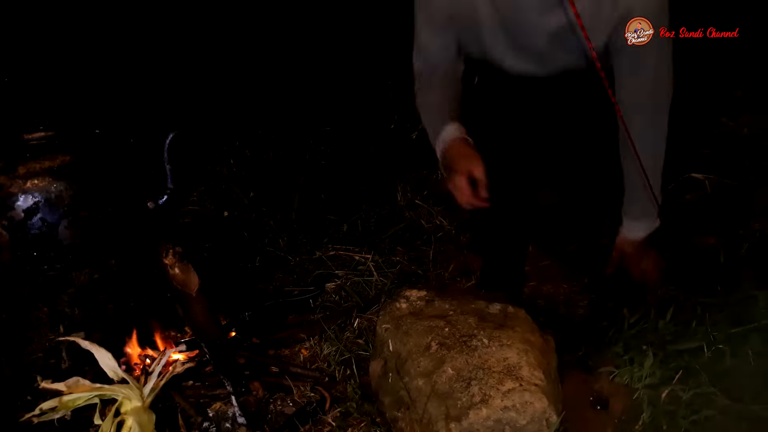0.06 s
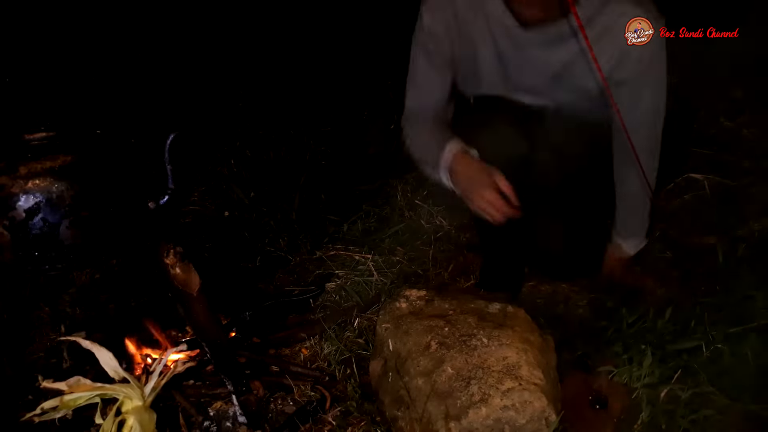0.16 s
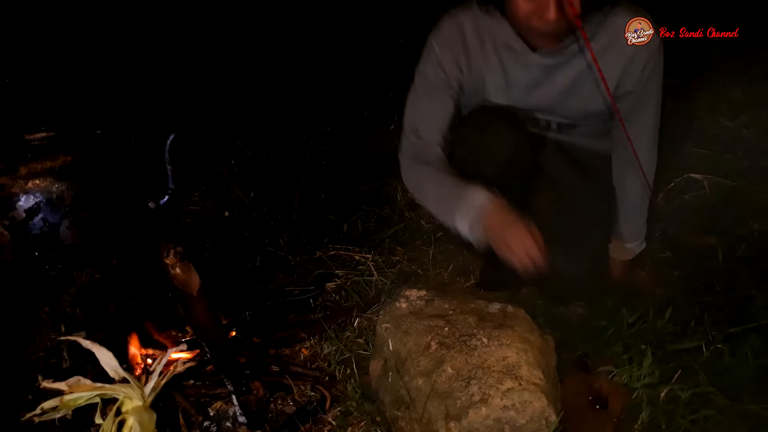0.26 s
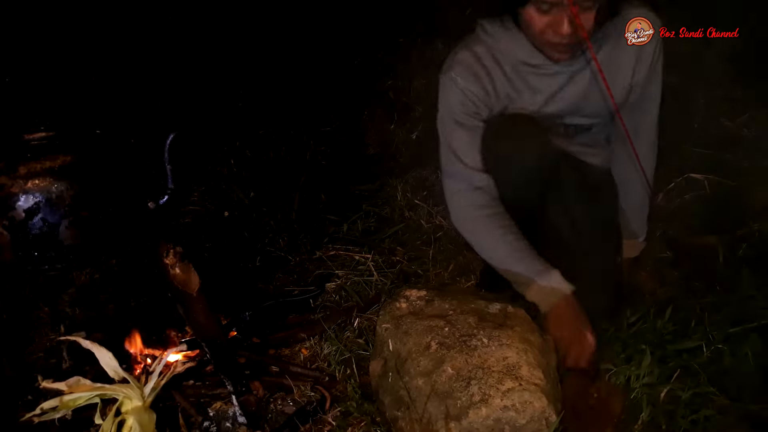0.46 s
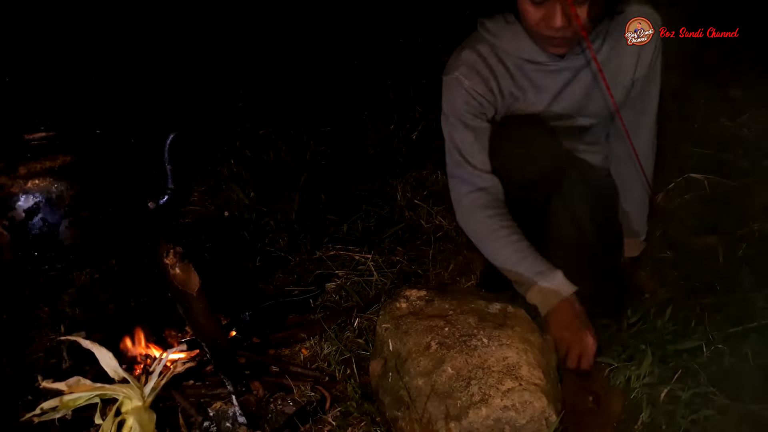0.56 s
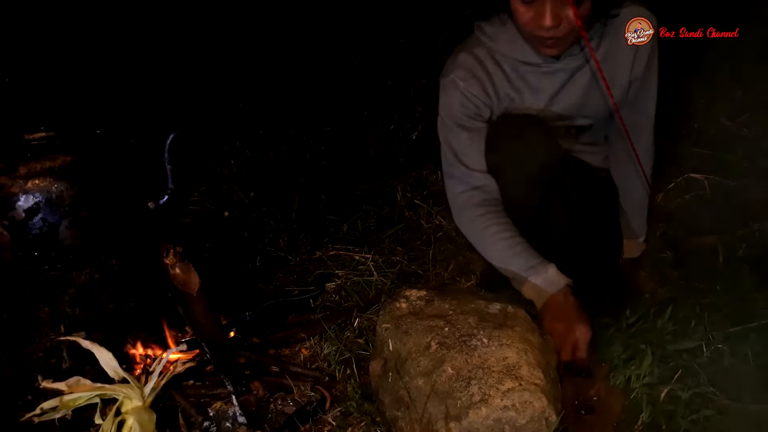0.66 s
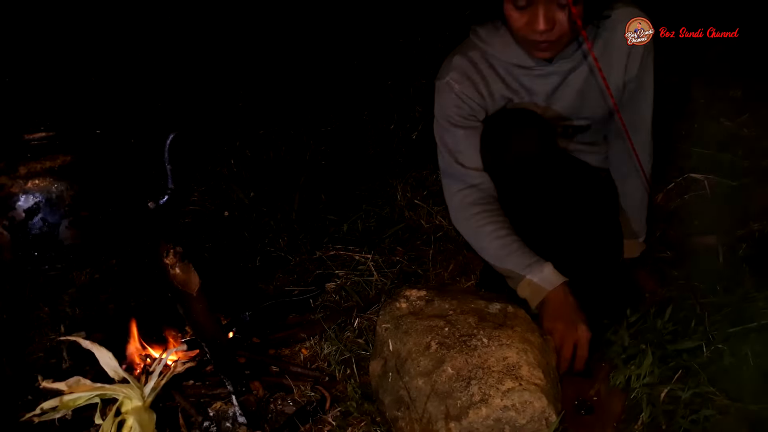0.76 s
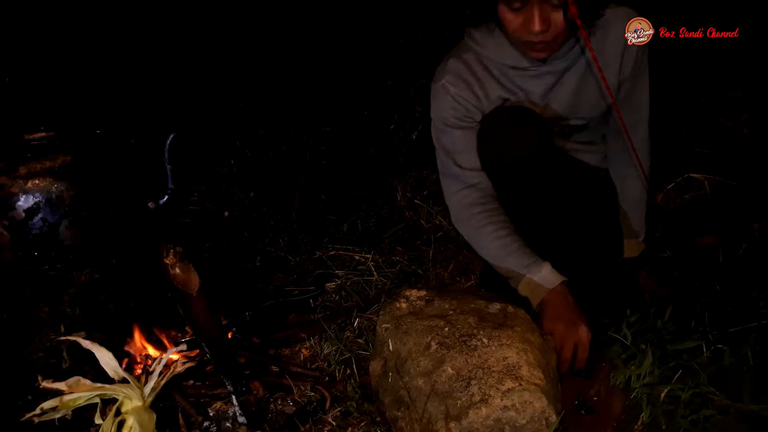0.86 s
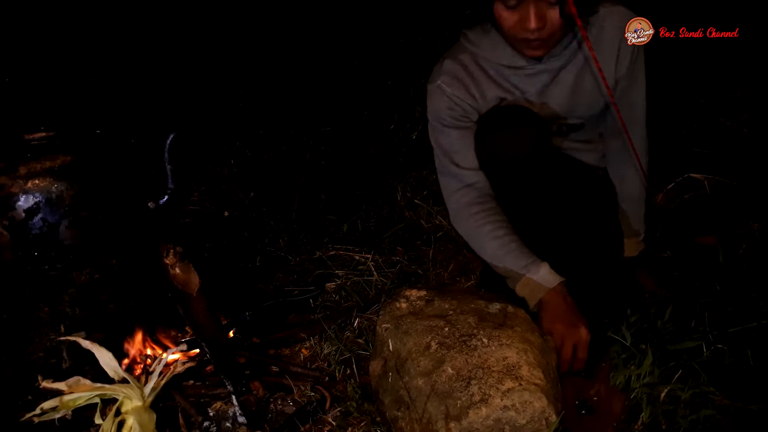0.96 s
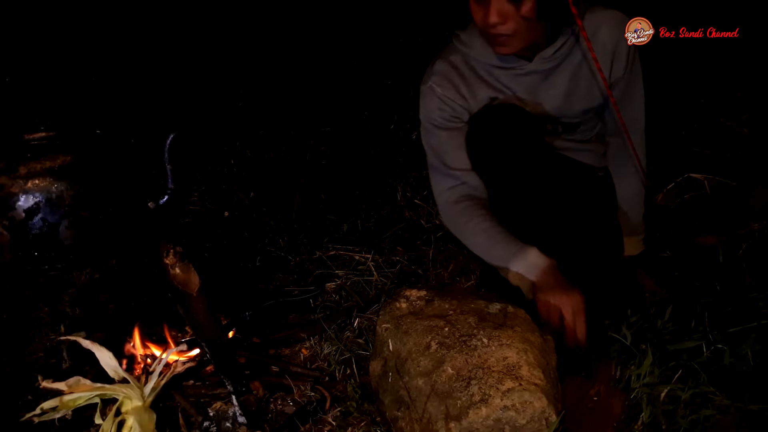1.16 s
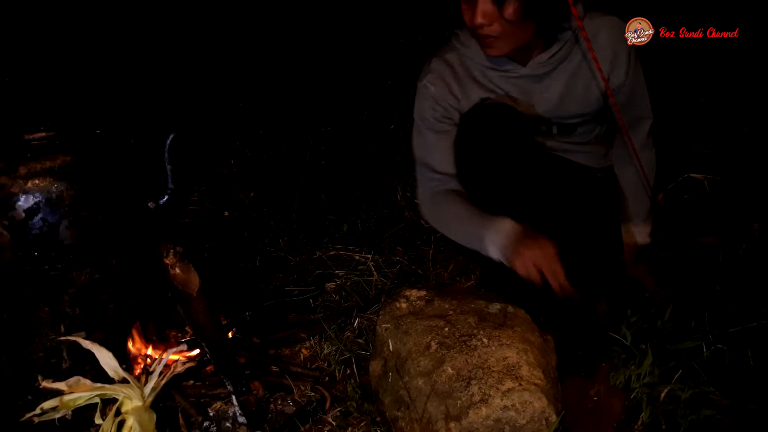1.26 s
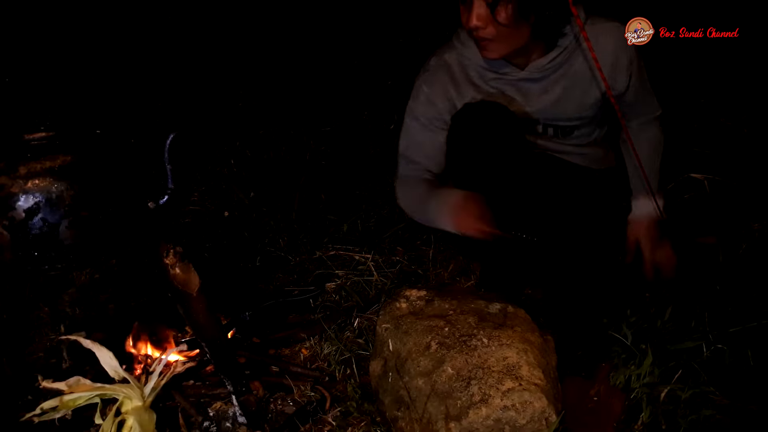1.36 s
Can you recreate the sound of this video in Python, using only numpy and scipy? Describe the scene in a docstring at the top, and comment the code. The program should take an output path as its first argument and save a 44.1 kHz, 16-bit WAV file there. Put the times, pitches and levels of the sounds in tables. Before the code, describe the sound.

A small fire of dry stalks crackles close by outdoors at night. Light ticks open, with a crisp double pop at 0.24 s. Snaps thicken from 0.4 s, some with a brief hollow woody ring, and strong pops at 0.5-0.6 s lead to the loudest crack at 0.67 s. Then sparse small pops continue to 1.4 s. Flame hiss swells midway and sinks; distant insects shimmer and a cricket pulses rapidly throughout.

```python
"""Sharp pops with short scattered tails, from a small fire of dry stalks outdoors at night. Among them come thin
treble ticks, low puffs, a hollow stalk that rings when it cracks, and tiny crackle. Behind, a far insect chorus
hisses in the treble and one cricket pulses steadily; the overall level under the pops swells and sinks, set layer
by layer. Hisses are shaped noise, pops and ticks are bursts with noise tails, the stalk is a set of dying modes."""
import sys
import numpy as np
from scipy import signal
from scipy.fft import rfft, irfft, next_fast_len
from scipy.io import wavfile
from scipy.ndimage import uniform_filter1d

SR = 44100
rng = np.random.default_rng(int(sys.argv[2]) if len(sys.argv) > 2 else 0)


def bounce(signal):
    """Save signal as a 16-bit WAV file at the path given by the first command-line argument."""
    frames = np.transpose(np.atleast_2d(signal))
    limited = np.clip(frames, -1, 1)
    pcm = np.round(limited * 32767).astype(np.int16)
    wavfile.write(sys.argv[1], SR, pcm)


def attenuation_scalar(level_db):
    """Turn a level in dB into a linear amplitude multiplier (20 dB per decade)."""
    decades = np.asarray(level_db, float) / 20
    return 10 ** decades


N = 61740  # samples, 1.4 s
TOP_HZ = 15970  # upper limit of the crackle pitches and of the finished sound


def unit(x):
    """Scale to rms 1."""
    return x / np.sqrt(np.mean(x ** 2) + 1e-20)


def curves(rows):
    """One value per sample for each column after the time."""
    time_s, *columns = np.transpose(rows)
    return [np.interp(np.arange(N) / SR, time_s, column) for column in columns]


def filtered(x, response):
    """Apply a response given as a function of frequency in Hz."""
    size = next_fast_len(x.shape[-1] + 4096)
    spectrum = rfft(x, size) * response(np.fft.rfftfreq(size, 1 / SR))
    return irfft(spectrum, size)[..., :x.shape[-1]]


def hiss(spectrum, patchy_db, size, bins, frames):
    """Coloured noise of rms 1, with patches of random gain over time and pitch."""
    noise = signal.stft(rng.standard_normal(N), nperseg=size)[2]
    across_pitch = uniform_filter1d(rng.standard_normal(noise.shape), bins, 0)
    patches = unit(uniform_filter1d(across_pitch, frames, 1))
    patchy = signal.istft(noise * attenuation_scalar(patchy_db * patches), nperseg=size)[1][:N]
    pitch_hz, level_db = np.transpose(spectrum)

    def colour(hz):
        return attenuation_scalar(np.interp(np.log(hz + 1), np.log(pitch_hz + 1), level_db))

    return unit(filtered(patchy, colour))


def place(s, rows, lead):
    """Sum rows of samples that begin lead samples before the times s."""
    at = np.floor(s * SR).astype(int)[:, None] + np.arange(rows.shape[1]) - lead
    keep = (at >= 0) & (at < N)
    return np.bincount(at[keep], rows[keep], N)


def bursts(s, db, hz, cycles):
    """Pressure bursts, push then pull, of a few cycles centred on s; db is their peak."""
    t = (np.arange(-400, 400) - (s * SR % 1)[:, None]) / SR
    turns = t * hz[:, None]
    slower = np.where(t > 0, 1.35, 1)  # a burst dies 1.35 times slower than it rises
    envelope = np.exp(-(turns / np.reshape(cycles, (-1, 1)) / slower) ** 2)
    rows = -np.sin(2 * np.pi * turns) * envelope
    gain = attenuation_scalar(db) / np.abs(rows).max(1)
    return place(s, rows * gain[:, None], lead=400)


def tails(s, db, hz, t60, width_oct):
    """Noise around each pitch that rises quickly and dies by 60 dB in t60 seconds."""
    t = np.arange(2048) / SR

    def band(f):
        return np.exp(-(np.log2((f + 1) / hz[:, None]) / width_oct) ** 2)

    noise = filtered(rng.standard_normal((len(s), len(t))), band)
    noise = noise / noise.std(1, keepdims=True)
    rise_s = 0.00082
    envelope = attenuation_scalar(-60 * t / t60) * (1 - np.exp(-t / rise_s))
    return place(s, noise * envelope * attenuation_scalar(db)[:, None], lead=0)


# far insect chorus, spectrum shape: pitch_hz [Hz], level_db [relative dB per Hz]
CHORUS_SPECTRUM = [(3060, -22.5), (5200, -14), (5430, -26), (6010, -7.5), (6640, -7.5), (8110, -2.5),
                   (8470, -5.5), (9210, -14.5), (9900, -34), (12900, -41), (21800, -120)]


def insect_chorus():
    """Many far insects blur into noise: a quickly patchy buzz plus thin, narrower voices."""
    buzz = hiss(CHORUS_SPECTRUM, 2.7, size=128, bins=3, frames=3)
    thin_voices = hiss(CHORUS_SPECTRUM, 4.9, size=2048, bins=2, frames=5)
    return unit(buzz + attenuation_scalar(-4) * thin_voices)


# high hiss of the night, spectrum shape: pitch_hz [Hz], level_db [relative dB per Hz]
HIGH_SPECTRUM = [(5710, -17), (9700, -5), (10500, -4.5), (13800, 0.5), (15100, -1), (15800, -14)]


def high_hiss():
    """Shaped noise with slight patches, strongest at the very top of the treble."""
    return hiss(HIGH_SPECTRUM, 0.73, size=128, bins=5, frames=2)


def cricket():
    """Evenly spaced pulses of one tone, sagging in pitch within each pulse and varying a little in level."""
    pitch_hz, rate_hz, first_s = 3534, 19.08, 0.044
    pulse_s = 0.0049  # standard deviation of the bell-shaped pulse
    sag_hz = 147  # fall in pitch from one pulse_s before the centre to one after
    s = np.arange(first_s - 1 / rate_hz, N / SR, 1 / rate_hz)
    random = rng.standard_normal((len(s), 2))
    t = np.arange(-800, 800) / SR
    turns = pitch_hz * t - sag_hz * t * t / (4 * pulse_s) + random[:, :1]
    envelope = np.exp(-(t / pulse_s) ** 2 / 2)
    level = attenuation_scalar(1.5 * random[:, 1:])
    return place(s, np.sin(2 * np.pi * turns) * envelope * level, lead=800)


# low rumble, spectrum shape: pitch_hz [Hz], level_db [relative dB per Hz]
RUMBLE_SPECTRUM = [(18, -52), (30, -20.5), (96, -1.5), (204, -10), (235, -35), (260, -27), (340, -44),
                   (570, -120)]


def rumble():
    """Bass noise in slow patches."""
    return hiss(RUMBLE_SPECTRUM, 2.9, size=2048, bins=2, frames=3)


# hiss of the flames, spectrum shape: pitch_hz [Hz], level_db [relative dB per Hz]
FLAME_SPECTRUM = [(120, -32), (200, -11), (429, -5), (598, -3), (945, -6), (1130, -3.5), (1580, -11),
                  (2570, -2), (2990, -7), (3630, -2), (5500, -3), (7150, -5), (12100, -120)]


def flames():
    """Broad noise with light patches."""
    return hiss(FLAME_SPECTRUM, 1.25, size=256, bins=4, frames=4)


# tiny crackle, one kind a row: rate [per s], level_db [dB, before scatter and swell],
# pitch_hz [Hz, middle], spread_oct [octaves, half the reach to each side], cycles [cycles],
# scatter_db [dB, negative weakens]
CRACKLE_KINDS = [(220, -45.5, 3330, 0.49, 0.47, 3.5), (120, -41.5, 7800, 0.12, 2.3, -4),
                 (87.6, -43.5, 8900, 0.28, 0.39, 5), (38.7, -58, 890, 0.23, 1, 2)]


def crackle():
    """Many tiny bursts at random moments, with random pitches and sizes skewed to one side."""
    out = np.zeros(N)
    for rate, level_db, middle_hz, spread_oct, cycles, scatter_db in CRACKLE_KINDS:
        moment, pitch, size = rng.random((int(rate * N / SR), 3)).T
        pitch_hz = np.minimum(middle_hz * 2 ** (spread_oct * 2 * (2 * pitch - 1)), TOP_HZ)
        db = level_db - scatter_db * np.log(1 - .9 * size)
        out += bursts(moment * N / SR, db, pitch_hz, cycles)
    return out


# thin treble ticks; the rows near 7-8 kHz at .5106, .5227, .5243 and .6697 s are instead a brief ring at the
# front of the biggest pops: centre_s [s], level_db [dB, peak of the burst], pitch_hz [Hz]
TICK_EVENTS = [(.0030, -25.5, 13700), (0.0445, -28, 12900), (.0993, -32, 12100), (0.1664, -23, 12800),
               (.2650, -25, 13200), (.5140, -34, 13300), (.5346, -35, 13000), (0.5523, -22, 13700),
               (.5734, -44, 12400), (.5768, -26, 12700), (.5905, -22.5, 12900), (.6048, -31, 12200),
               (.6677, -34, 14100), (.6697, -23, 8150), (.5106, -18.5, 7000), (.5227, -39, 7060),
               (.5243, -30, 7100), (.0898, -36, 10800), (.6055, -18, 7940), (.7366, -31, 13200),
               (.7858, -35, 14000), (1.0859, -30, 14600), (1.1074, -26, 14500), (1.3128, -35, 12300),
               (1.3873, -30, 12800)]


def ticks():
    """Short high bursts, each with a narrow dying tail at its own pitch."""
    s, db, hz = np.transpose(TICK_EVENTS)
    return bursts(s, db, hz, 1.4) + tails(s, db - 10, hz, t60=.008, width_oct=0.22)


# soft low puffs: centre_s [s], level_db [dB, peak], pitch_hz [Hz]
THUD_EVENTS = [(.2519, -40, 253), (.5114, -34.5, 435), (.6702, -17.5, 1160), (.6712, -33.5, 350)]


def thuds():
    """Low puffs: single bursts without a tail."""
    return bursts(*np.transpose(THUD_EVENTS), 0.7)


# ringing modes of the hollow stalk: pitch_hz [Hz], level_db [relative dB], t60_s [s]
STALK_MODES = [(1478, 1, .042), (2153, -4, .045), (2875, -11, .03), (3365, 3, .016), (4200, -11, .016)]
# its cracks: start_s [s], level_db [dB], centre_hz [Hz, of the blow], snap_db [dB, snap over the ring]
STALK_CRACKS = [(.4286, -28, 3600, -1), (0.5824, -24, 1620, 5), (0.6524, -13, 3470, -4)]


def stalk():
    """Every crack snaps and rings the modes that lie near its centre."""
    t = np.arange(4096) / SR
    rows = []
    for _, crack_db, blow_hz, _ in STALK_CRACKS:
        ring = np.zeros(len(t))
        for mode_hz, mode_db, t60_s in STALK_MODES:
            off_centre_db = 14 * np.log2(mode_hz / blow_hz) ** 2  # 14 dB per octave squared
            db = crack_db + mode_db - off_centre_db - 60 * t / t60_s
            ring += attenuation_scalar(db) * np.sin(2 * np.pi * mode_hz * t)
        rows.append(ring * (1 - np.exp(-t / 0.00022)))
    s, level_db, centre_hz, snap_over_db = np.transpose(STALK_CRACKS)
    snap_hz = np.sqrt(centre_hz * 3000)  # midway in pitch between the blow and 3000 Hz
    snap_db = level_db + snap_over_db
    snap = bursts(s + .5 / snap_hz, snap_db, snap_hz, 0.76)
    snap_tail = tails(s, snap_db - 12, snap_hz, t60=.02, width_oct=1.3)
    return place(s, np.array(rows), lead=0) + snap + snap_tail


# pops: centre_s [s], level_db [dB, peak of the burst], pitch_hz [Hz], length [cycles],
# tail_db [dB, relative to that peak]
POP_EVENTS = [(.0345, -41.5, 2550, .5, -2), (.1628, -32, 4500, 0.34, -20), (.1662, -23.5, 2040, 0.39, -22),
              (.2396, -13.5, 2740, 0.41, -31), (.2423, -11, 3000, 0.27, -25), (.2650, -33, 2500, 0.73, -17),
              (.2905, -27, 1460, 0.31, -11.5), (.2915, -30, 2600, .8, -25), (.3380, -38, 3200, .6, -13),
              (.3583, -19.5, 3680, 1.23, -20), (.3829, -24.5, 3250, 0.31, -18),
              (.4045, -25.5, 2320, 0.36, -14), (.4070, -34.5, 1220, 1.7, -4), (0.414, -36, 1800, 0.34, 1),
              (.4390, -34, 1200, 1.6, -8), (.4215, -27, 3000, 1.2, -14), (.4290, -26, 5500, .6, -10),
              (.4325, -23, 2000, 1.6, -12), (.4328, -24, 3500, .4, -8), (.4365, -25.5, 3500, 1.3, -10),
              (.5052, -26, 3000, 0.27, -7.5), (.51045, -11, 2600, .33, -18),
              (.52257, -14.5, 3600, .33, -22), (.5242, -19, 3600, .33, -18), (.5345, -37, 2000, 0.66, -38),
              (.5770, -28.5, 4000, 0.99, -23), (.5906, -23, 3500, 0.3, -17), (.6033, -17, 3000, .4, -12),
              (.6040, -25, 7500, 1.5, -8), (.6045, -19, 3500, .4, -14), (.6053, -22, 4000, .4, -12),
              (.66961, -.5, 3500, .4, -22), (.67011, -9, 3000, .33, -14), (.67185, -13, 3900, .8, -12),
              (.6733, -21, 2600, .8, -8), (.6808, -22, 14300, 4.5, -14), (.5113, -22, 2200, .5, -12),
              (.7550, -30.5, 2220, 0.3, -21), (.0443, -37, 1500, 0.36, -19), (0.2417, -43, 3500, 0.45, -17),
              (.7180, -29, 2630, 0.43, -12), (.7860, -30, 3620, 0.54, -25), (.8490, -31.5, 3000, 0.84, -24),
              (.9080, -38, 2020, 0.58, -12), (.9502, -27, 4030, 1.2, -10), (.9720, -36, 2470, 1.6, -5),
              (1.0352, -30, 3300, 0.31, -16), (1.0859, -25, 4800, 0.53, -22), (1.0971, -28, 4000, .5, -9),
              (1.0975, -28.5, 5040, 1.2, -14), (1.0979, -27.5, 3000, 0.64, -18),
              (1.1074, -33, 5000, 0.8, -15), (1.1158, -33, 3000, .6, -15), (1.2905, -31, 2680, 0.51, -21),
              (1.3125, -30.5, 4500, 0.5, -26), (1.3170, -35.5, 1210, 0.49, -7),
              (1.3875, -29, 4520, 0.28, -10)]


def pops():
    """Each pop is a burst with a sharp front, a scattered tail around its pitch and a duller, longer one."""
    s, db, hz, cycles, tail_db = np.transpose(POP_EVENTS)
    body = bursts(s, db, hz, cycles)
    sharp_front = bursts(s, db - 21, np.full(len(s), 9100), 0.56)
    scattered = tails(s, db + tail_db, hz, t60=0.011, width_oct=0.48)
    dull = tails(s, db + tail_db - 9, .5 * hz, t60=0.065, width_oct=2.02)
    return body + sharp_front + scattered + dull


# overall level swell, set layer by layer: time_s [s], chorus_db [dB], high_hiss_db [dB],
# flames_db [dB, 6 under the level heard], rumble_db [dB]
OVERALL_SWELL = [(0.0, -44, -54, -56.5, -68), (0.144, -44, -51.5, -53, -67.5),
                 (0.408, -41.5, -49.5, -49.5, -59.5), (0.576, -39.5, -48.5, -50, -57),
                 (0.728, -41.5, -48.5, -51.5, -65.5), (0.86, -44, -51, -53, -63.5),
                 (1.06, -45, -54, -56.5, -66.5), (1.4, -46, -54, -56.5, -66.5)]


def scene():
    """Fire in front, insects behind."""
    chorus_db, high_db, flames_db, rumble_db = curves(OVERALL_SWELL)
    # cricket and crackle share the overall swell
    night = attenuation_scalar(chorus_db) * (insect_chorus() + attenuation_scalar(-6) * cricket()) + attenuation_scalar(high_db) * high_hiss()
    crackle_swell_db = 0.92 * (flames_db - flames_db.mean())
    fire = attenuation_scalar(flames_db + 6) * flames() + attenuation_scalar(rumble_db) * rumble() + attenuation_scalar(crackle_swell_db) * crackle()
    return (night + fire + ticks() + thuds() + stalk() + pops())[None]


def roll_off(x):
    """The treble ends steeply here."""
    return signal.sosfilt(signal.butter(12, 15970, fs=SR, output="sos"), x)


def record(dry):
    """The microphone drops the deep bass in two equal stages, and nothing is kept above TOP_HZ."""
    low_hz = 66.6  # corner of each stage

    def response(hz):
        microphone = (1j * hz / (low_hz + 1j * hz)) ** 2
        return microphone * (hz < TOP_HZ)

    return roll_off(filtered(dry, response))


dry = scene()
out = record(dry)
bounce(out)
```